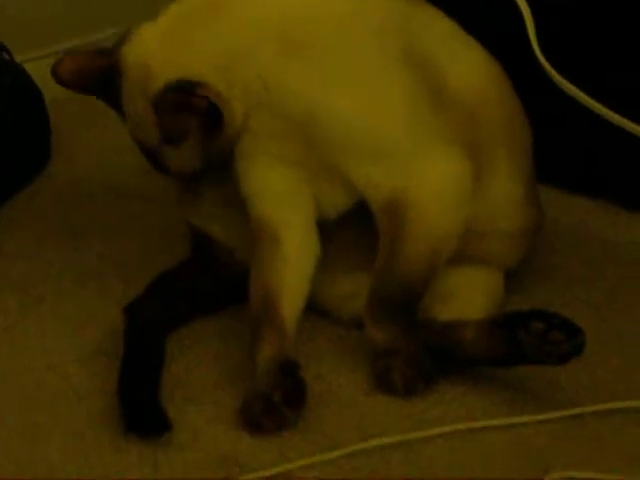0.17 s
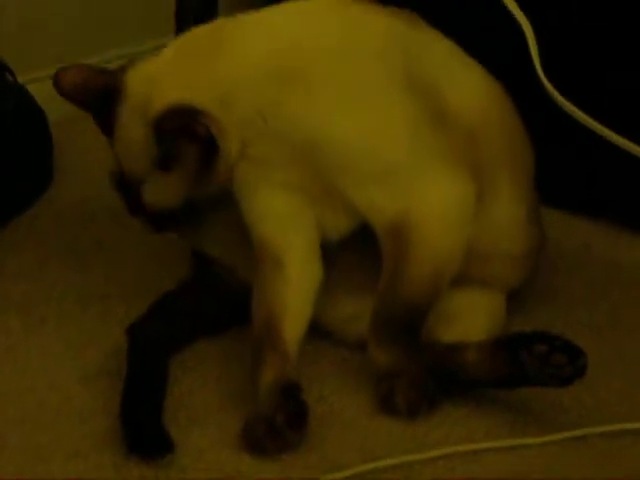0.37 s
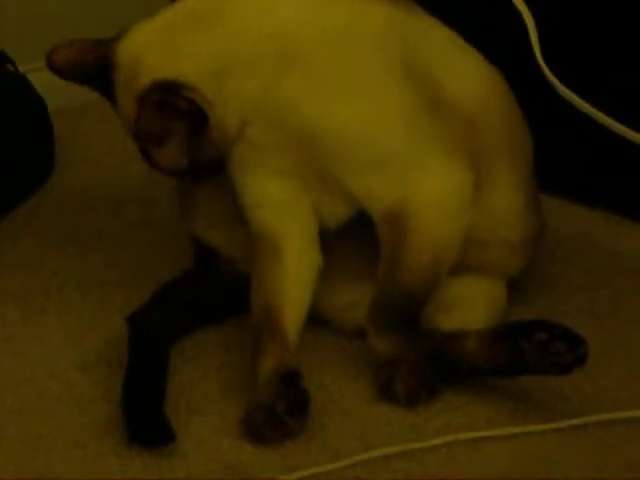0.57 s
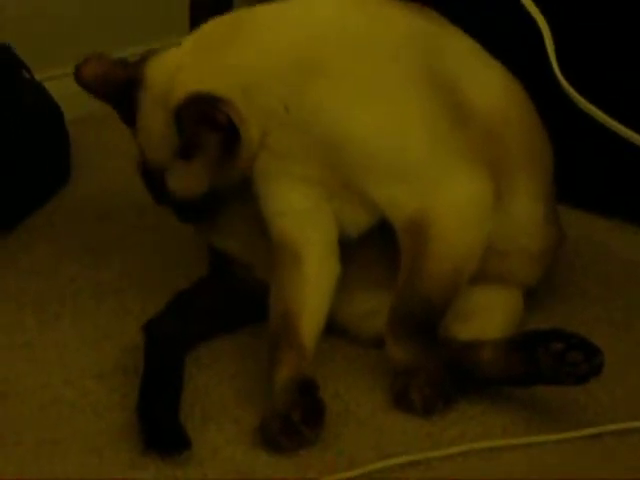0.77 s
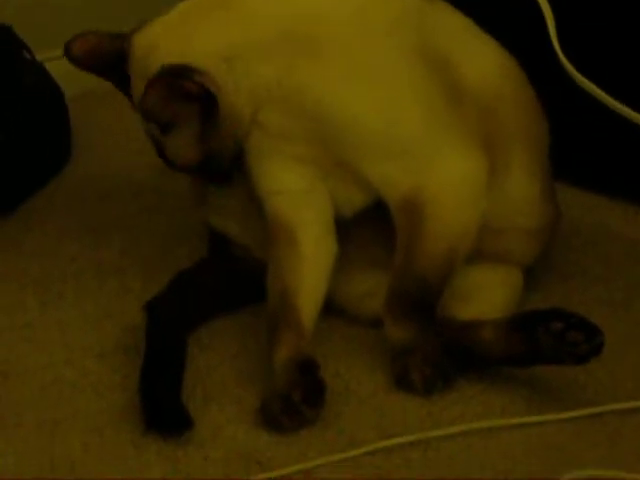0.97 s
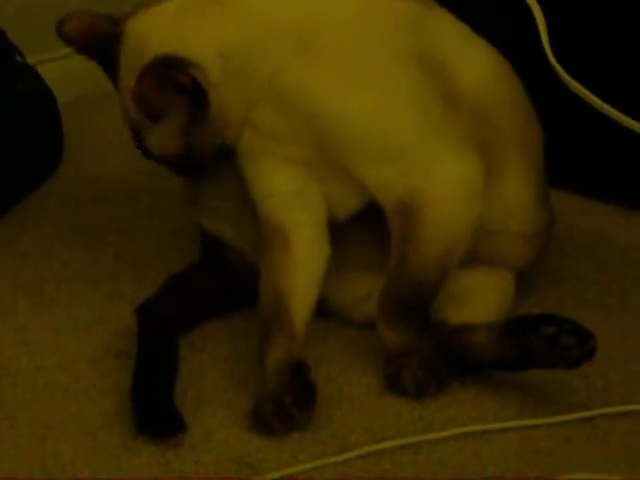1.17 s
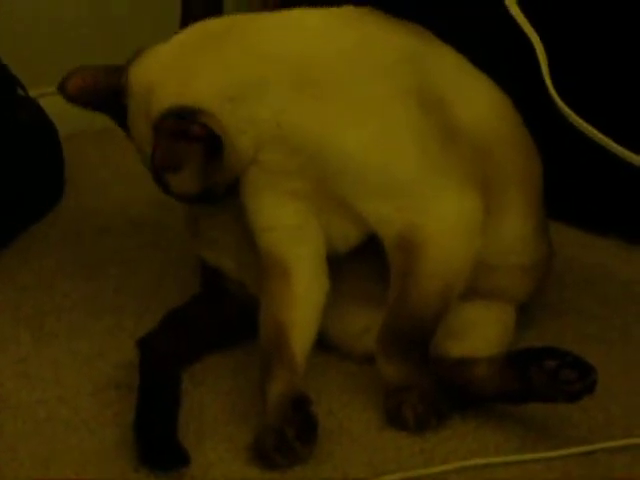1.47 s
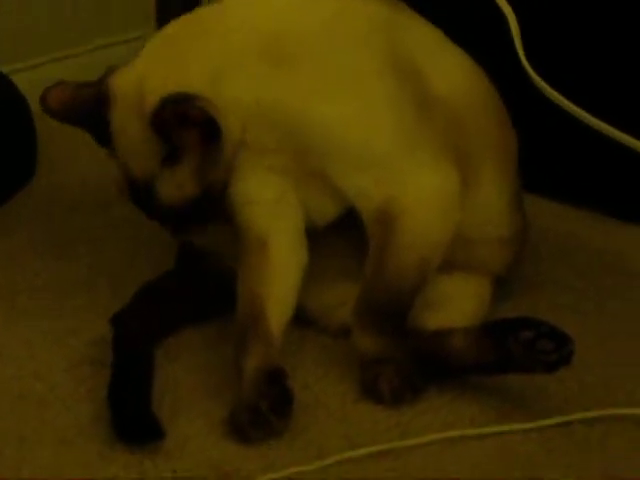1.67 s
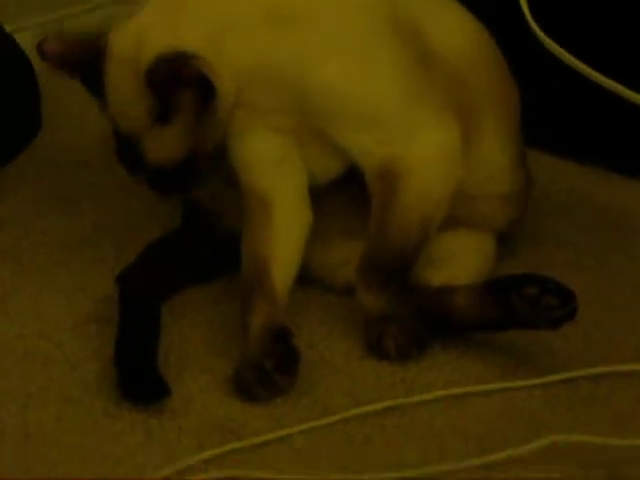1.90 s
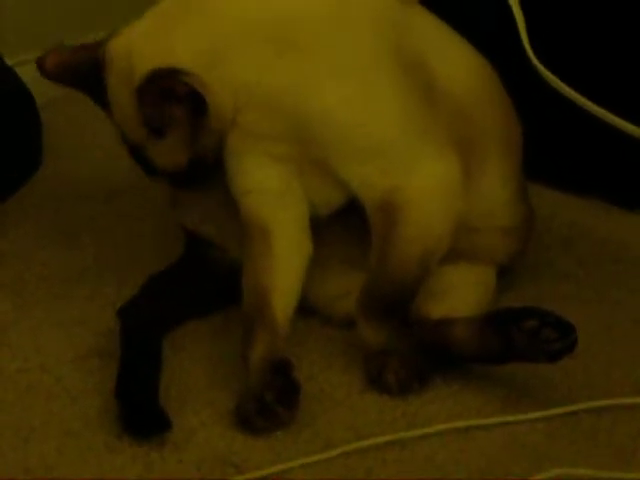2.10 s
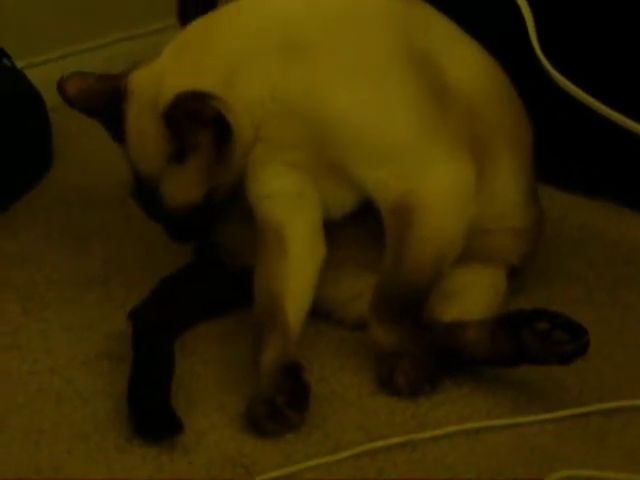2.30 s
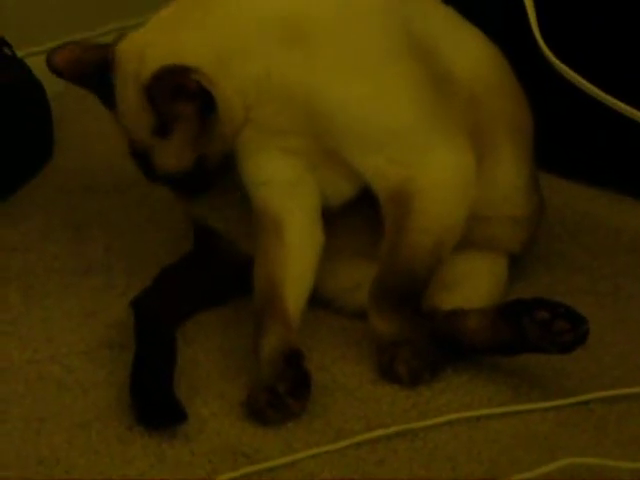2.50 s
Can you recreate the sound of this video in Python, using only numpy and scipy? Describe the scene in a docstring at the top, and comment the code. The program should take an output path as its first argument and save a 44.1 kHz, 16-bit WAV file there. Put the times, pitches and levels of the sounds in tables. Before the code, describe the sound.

Two sharp, hard clicks close to the microphone, then faint wet licking ticks over room hiss

```python
"""A cat grooms its shoulder on a carpet in a quiet room: faint wet ticks of tongue and teeth,
each a short smack of noise that rings the mouth.
Two sharp clicks close to the microphone, built from damped resonances and noise, overload a small camera.
Its narrow-band sound carries steady hiss, mains hum, a thin whine and a low drone that swells and sinks."""
import sys
import numpy as np
from scipy import signal
from scipy.fft import rfft, irfft
from scipy.io import wavfile

SR = 44100
rng = np.random.default_rng(int(sys.argv[2]) if len(sys.argv) > 2 else 0)


def unload_audio(sound):
    """Save the sound as a 16-bit wav file, at the path given as the first command line argument."""
    columns = np.transpose(np.atleast_2d(sound))
    # keep every value between -1 and 1, then stretch to whole-number steps
    steps = np.round(np.clip(columns, -1, 1) * 32767)
    wavfile.write(sys.argv[1], SR, steps.astype(np.int16))


N = 116865


def undb(db):
    """Decibels to amplitude gain."""
    return 10 ** (np.asarray(db) / 20)


def unit(x):
    """Scale to rms 1."""
    return x / np.sqrt(np.mean(x ** 2))


def since(start_s):
    """Seconds since an event, zero before it."""
    return np.maximum(np.arange(N) / SR - start_s, 0)


def noise(points):
    """Noise of rms 1 coloured by (Hz, dB) points, joined along log frequency."""
    point_hz, point_db = np.array(points, float).T
    f = np.maximum(np.fft.rfftfreq(N, 1 / SR), 1)
    colour = undb(np.interp(np.log(f), np.log(point_hz), point_db))
    return unit(irfft(rfft(rng.standard_normal(N)) * colour, N))


def walk(rate_hz):
    """Slow random drift of rms 1: noise under a Gaussian low-pass."""
    f = np.fft.rfftfreq(N, 1 / SR)
    return unit(irfft(rfft(rng.standard_normal(N)) * np.exp(-(f / rate_hz) ** 2), N))


def decay(t, attack_s, t60_s):
    """Quick exponential rise, then an exponential fall of 60 dB in t60_s."""
    rise = 1 - np.exp(-t / attack_s)
    return rise * np.exp(-np.minimum(np.log(1000) * t / t60_s, 20))


def ring(t, hz, attack_s, t60_s):
    """One damped resonance: a sine under a decaying envelope."""
    return np.sin(2 * np.pi * hz * t) * decay(t, attack_s, t60_s)


def tone(hz, waver):
    """A line of rms 1 whose amplitude and phase drift at random by the waver share."""
    waver_hz = 9
    swing = 1 + waver * (walk(waver_hz) + 1j * walk(waver_hz))
    return unit(np.real(swing * np.exp(2j * np.pi * hz * since(0))))


def add(out, start_s, x):
    """Mix a short sound in at a time."""
    i = int(start_s * SR)
    out[i:i + len(x)] += x[:N - i]


def hiss():
    """Steady hiss and room rumble: coloured noise whose level flickers slightly."""
    # spectrum of hiss and rumble: frequency_hz, relative_level_db (per Hz)
    hiss_colour = [(20, -1.5), (27, -2), (38, -14.5), (80, -6), (115, -4), (150, -9), (260, -6), (390, -6),
                   (650, -7.5), (1000, -6.5), (1300, -4.5), (1900, -9), (2800, -12), (4000, -13.5),
                   (5100, -13.5), (6000, -19.5)]
    level_db, flicker_db, flicker_hz = -36, 0.34, 6.5
    return undb(level_db + flicker_db * walk(flicker_hz)) * noise(hiss_colour)


def hum_and_whine():
    """Mains hum and a thin high whine: a sum of steady lines, each wavering at random."""
    # lines of the hum, then the whine: frequency_hz, level_db (rms), waver_share
    lines = [(59, -55, 0.36), (171.5, -56.5, 0.27), (225, -57.5, 0.66), (376, -58.5, 0.71),
             (5000, -59, .15)]
    return sum(undb(level_db) * tone(hz, waver) for hz, level_db, waver in lines)


def drone():
    """A low wavering line that swells and sinks along a level curve."""
    # level curve of the drone: time_s, level_db (rms)
    level_curve = [(0, -51), (.2, -47.5), (.42, -46), (.62, -57.5), (.85, -46.5), (1.1, -56), (1.55, -49.5),
                   (1.9, -57), (2.25, -50), (2.65, -56)]
    drone_hz, waver = 111.3, 0.53
    time_s, level_db = np.array(level_curve).T
    return undb(np.interp(since(0), time_s, level_db)) * tone(drone_hz, waver)


def room(x):
    """Short dull tail of a carpeted room: convolution with decaying low-passed noise."""
    level_db, t60_s, treble_limit_hz = -24.5, 0.097, 1200
    t = np.arange(SR // 2) / SR
    soften = signal.butter(1, treble_limit_hz, fs=SR, output="sos")
    tail = signal.sosfilt(soften, rng.standard_normal(len(t))) * decay(t, .004, t60_s)
    tail /= np.linalg.norm(tail)
    return undb(level_db) * signal.fftconvolve(x, tail)[:N]


def clicks():
    """Hard little snaps: a crack, a main ring that rises in pitch, side modes and a hollow low knock."""
    # sharp clicks, the second with a light first contact: start_s, level_db, side_mode_pitch_ratio,
    # snap_hz, snap_db (re level), knock_db (re level)
    snaps = [(0.2460, 7, 0.99, 3093, 6, -16.5), (0.3835, -5.5, 0.94, 3280, -6, -11),
             (0.3894, 3, 1.185, 3650, 6.5, -17.5)]
    # side modes of the clicks: frequency_hz (before the pitch ratio), level_db (re click level), t60_s
    side_modes = [(920, -16.5, 0.023), (1140, -18.5, 0.024), (1620, -13.5, 0.016), (2108, -7.5, 0.016),
                  (2640, -8.5, 0.009), (3340, -4, 0.0073), (4007, -18.5, 0.0098), (4600, -21, 0.01)]
    # colour of the crack: frequency_hz, relative_level_db
    crack_colour = [(40, -6), (200, -15), (400, -14), (1000, -1.5), (2000, -2.5), (3200, 4), (4200, 6),
                    (6000, -1.5)]
    attack_s = 0.00071
    knock_hz, knock_t60_s = 410, .025
    crack_db, crack_t60_s = -10, .015
    snap_attack_s, snap_t60_s = 0.0013, 0.0075
    rise_share, rise_s = 0.54, 0.00075  # the snap starts flat by this share and rises to pitch

    out, t = np.zeros(N), np.arange(SR // 20) / SR
    # lost phase time, so that the pitch climbs
    lag = rise_share * rise_s * (1 - np.exp(-t / rise_s))
    for start_s, level_db, pitch, snap_hz, snap_db, knock_db in snaps:
        snap = np.sin(2 * np.pi * snap_hz * (t - lag)) * decay(t, snap_attack_s, snap_t60_s)
        body = np.zeros(len(t))
        for k, (hz, mode_db, t60_s) in enumerate(side_modes):
            sign = (-1) ** k  # neighbouring modes start in opposite directions
            body += sign * undb(mode_db) * ring(t, hz * pitch, attack_s, t60_s)
        knock = ring(t, knock_hz, attack_s, knock_t60_s)
        crack = noise(crack_colour)[:len(t)] * decay(t, attack_s, crack_t60_s)
        click = undb(snap_db) * snap + body + undb(knock_db) * knock + undb(crack_db) * crack
        add(out, start_s, undb(level_db) * click)
    return out


def licks():
    """The tongue parts from wet fur: a tiny smack of noise rings the mouth for a few cycles."""
    # wet mouth ticks: start_s, level_db (before the doubling below), resonance_hz, t60_s,
    # smack_db (noise re level)
    ticks = [(0.5168, -26, 2000, 0.0062, -15), (0.6717, -21.5, 795, 0.011, -6),
             (0.8640, -27.5, 2100, 0.0064, -4), (1.4023, -17.5, 2500, 0.009, -7),
             (1.5361, -20.5, 960, 0.0088, -10.5), (1.5765, -17, 1010, 0.0097, -5.5),
             (1.8570, -26.5, 2380, 0.0087, -4), (1.8990, -22, 2350, 0.01, -5), (2.1491, -17, 910, .008, -5),
             (2.1490, -24.5, 1870, .010, -15), (2.1493, -17, 3590, 0.0079, -5.5),
             (2.1517, -20.5, 4640, 0.0084, -10.5), (2.3734, -14.5, 2375, .010, -12.5)]
    # weaker resonances of the mouth beside the main one: pitch_ratio, level_db (re main)
    mouth_modes = [(.78, -10.5), (1.3, -9)]
    attack_s = .0008
    edge_ratios = np.array([0.26, 1.94])  # band edges of each smack around its resonance

    out, t = np.zeros(N), np.arange(SR // 20) / SR
    for start_s, level_db, hz, t60_s, smack_db in ticks:
        mouth = ring(t, hz, attack_s, t60_s)
        for ratio, side_db in mouth_modes:
            mouth -= undb(side_db) * ring(t, hz * ratio, attack_s, t60_s)
        band = signal.butter(2, hz * edge_ratios, "band", fs=SR, output="sos")
        smack = unit(signal.sosfilt(band, rng.standard_normal(len(t)))) * decay(t, attack_s, t60_s)
        add(out, start_s, 2 * undb(level_db) * (mouth + undb(smack_db) * smack))
    return out


def scene():
    """Clicks and licks with their room tail, over hiss, hum, whine and drone."""
    background = hiss() + hum_and_whine() + drone()
    near = clicks() + licks()
    return (near + room(near) + background)[None]


def record(dry):
    """The camera keeps only the lower treble; the loudest peaks then clip and splash above it."""
    treble_limit_hz, edge_hz = 5567, 197  # edge_hz sets the softness of the limit
    clip_level, hardness = .72, 16
    f = np.fft.rfftfreq(N, 1 / SR)
    band = np.exp(-np.logaddexp(0, (f - treble_limit_hz) / edge_hz))
    x = irfft(rfft(dry) * band, N)
    # the 0.5 lifts quiet sound by about 0.4 dB; peaks flatten at clip_level
    clipped = x / (0.5 + np.abs(x / clip_level) ** hardness) ** (1 / hardness)
    top_limit = signal.ellip(8, .2, 70, 15800, fs=SR, output="sos")  # low-pass, edge in Hz
    return signal.sosfilt(top_limit, clipped)


dry = scene()
out = record(dry)
unload_audio(out)
```